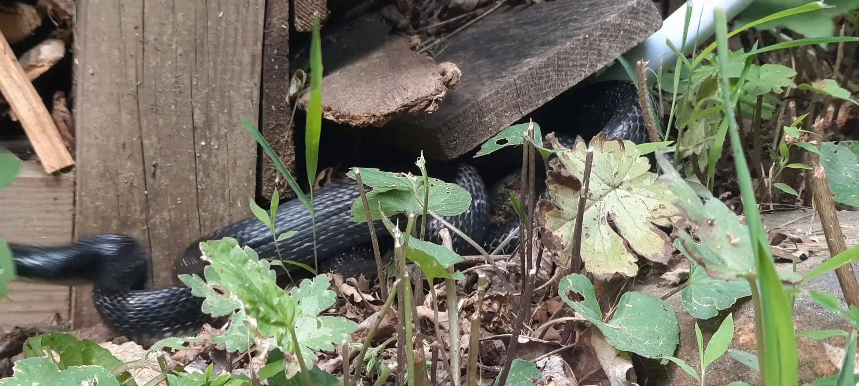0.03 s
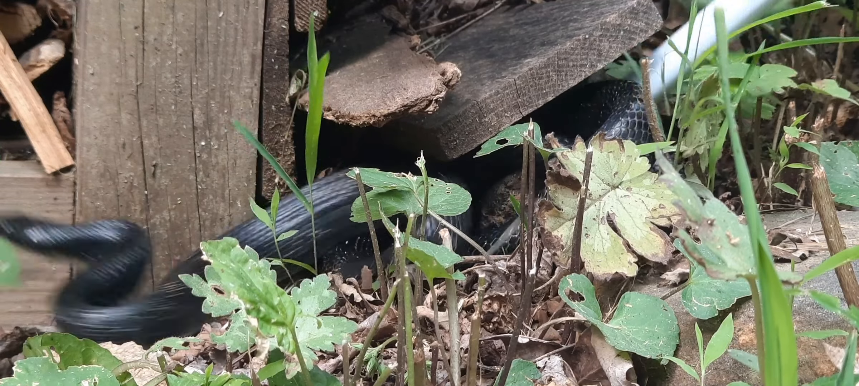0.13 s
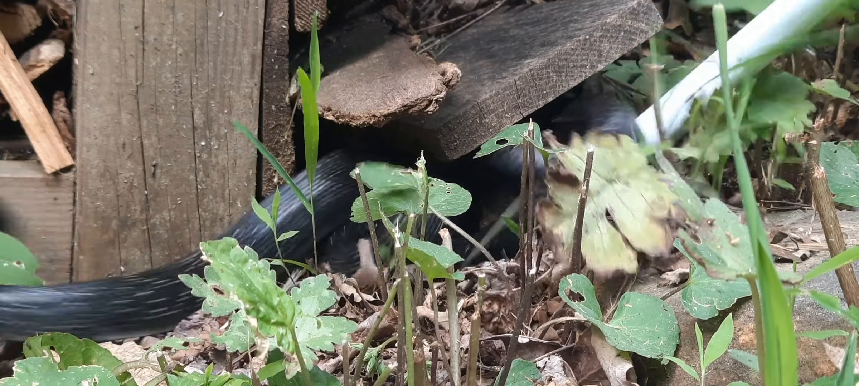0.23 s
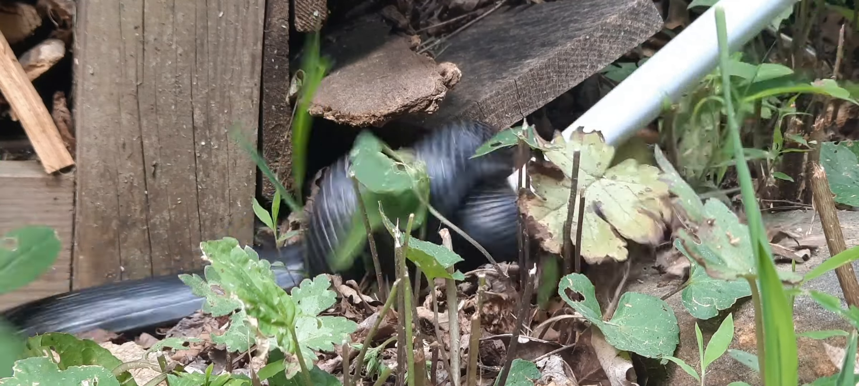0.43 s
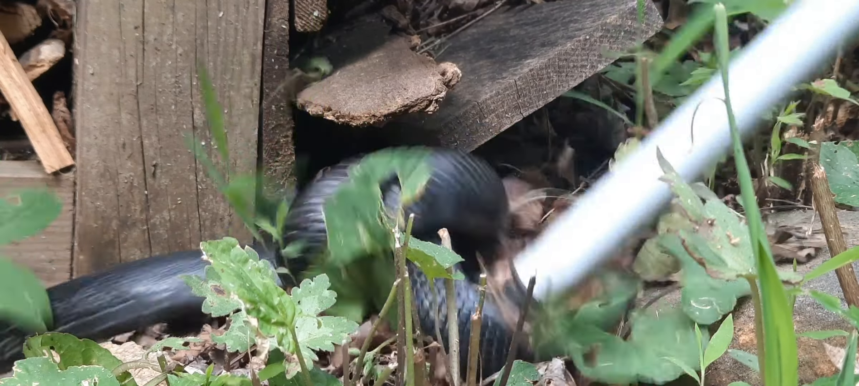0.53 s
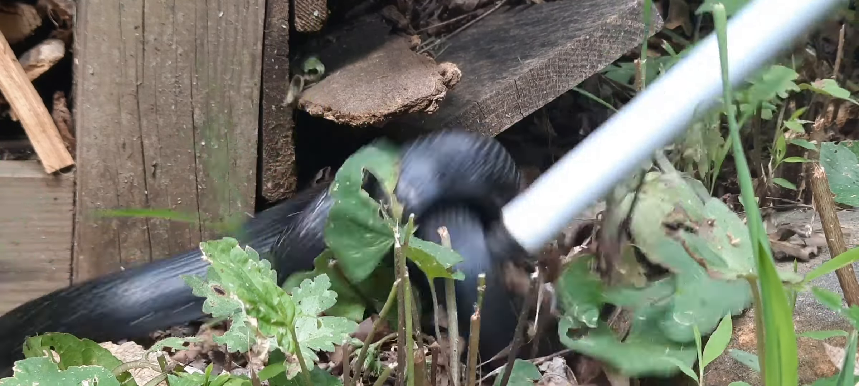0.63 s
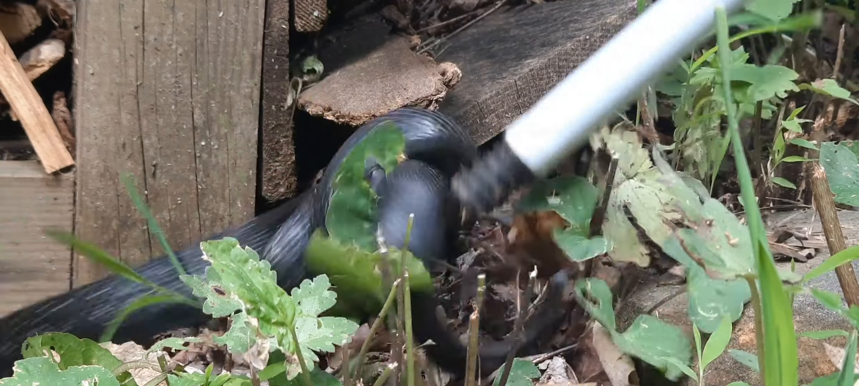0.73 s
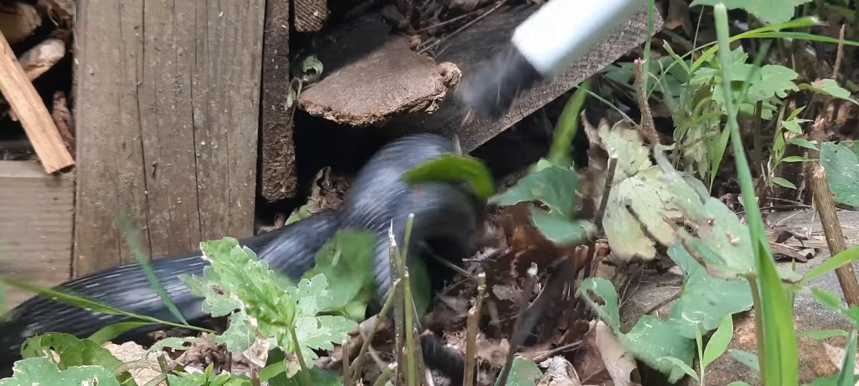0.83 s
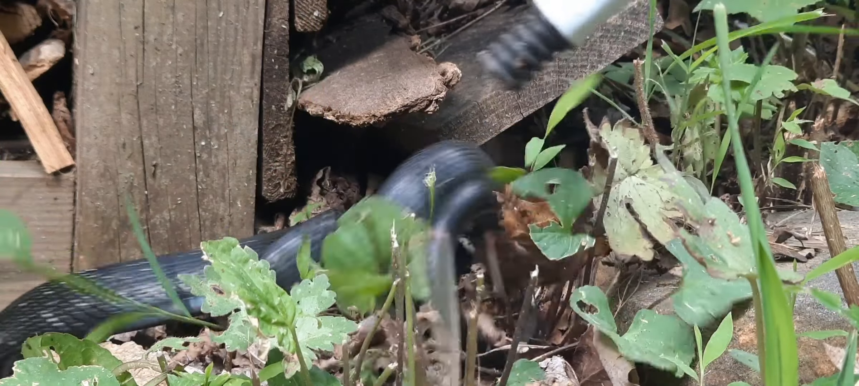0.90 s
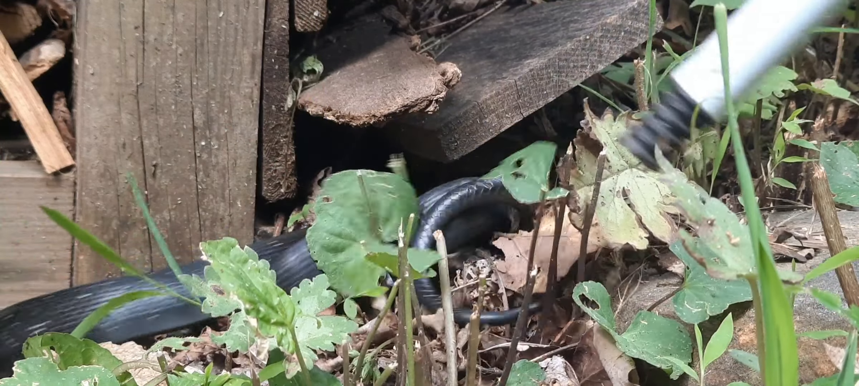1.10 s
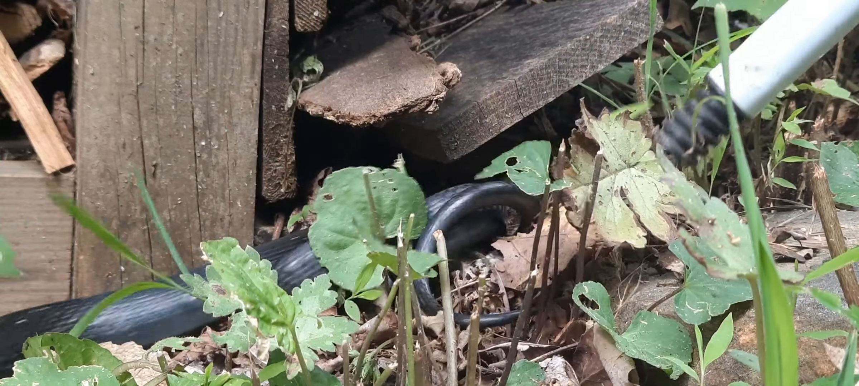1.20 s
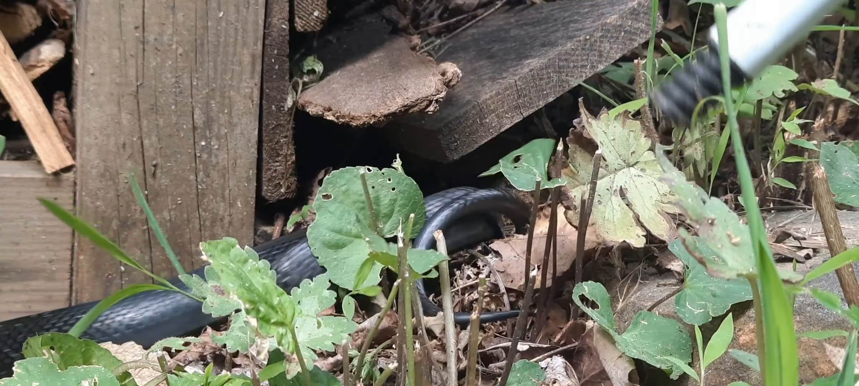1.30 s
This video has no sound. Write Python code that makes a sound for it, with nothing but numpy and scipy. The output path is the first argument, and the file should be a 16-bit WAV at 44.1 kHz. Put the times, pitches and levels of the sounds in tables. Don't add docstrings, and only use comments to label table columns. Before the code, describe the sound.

Close stereo rustling of dry leaves and weeds: quiet ticking, a short low wooden judder, then loud crackles and snapping stalks from a poking pole, easing into thin rustles over faint outdoor air.

```python
import sys
import numpy as np
from scipy import signal
from scipy.fft import rfft, irfft, next_fast_len
from scipy.io import wavfile
from scipy.ndimage import uniform_filter1d

SR = 44100
rng = np.random.default_rng(int(sys.argv[2]) if len(sys.argv) > 2 else 0)


def how_loud(loudness_db):
    steps = np.asarray(loudness_db, float) / 20
    return 10 ** steps


def persist_wave(psi):
    counts = np.round(np.clip(psi, -1, 1) * 32767).astype(np.int16)
    wavfile.write(sys.argv[1], SR, np.atleast_2d(counts).T)


N = 59535
T = np.arange(N) / SR


def rms_one(x):
    return x / np.sqrt(np.mean(x ** 2) + 1e-20)


def at_hz(points, hz):
    table_hz, value = np.array(points).T
    return np.interp(np.log(hz), np.log(table_hz), value)


def sides(pan_db):
    return how_loud(np.array([pan_db / 2, -pan_db / 2]))


def filtered(x, order, hz, kind):
    return signal.sosfilt(signal.butter(order, hz, kind, fs=SR, output="sos"), x)


def drift(rate_hz):
    r = np.exp(-80 * np.pi * rate_hz / SR)
    white = rng.standard_normal((2, N // 40 + 402))
    slow = signal.lfilter([1], [1, -2 * r, r * r], white)[:, 400:]
    return np.array([np.interp(np.arange(N) / 40, np.arange(len(v)), rms_one(v)) for v in slow])


# [pitch_hz, likeness_0_to_1]
LIKENESS = [(60, 0.54), (180, 1), (550, 0.75), (1650, 0.51), (4970, 0), (15000, 0.04)]


def bands():
    edges = 25 * 2 ** np.arange(0, 9.6, .5)
    white = rng.standard_normal((2, 2, N))
    for k, (low, high) in enumerate(zip(edges, edges[1:])):
        mid, side = filtered(white[k % 2], 2, [low, high], "band")
        hz = np.sqrt(low * high)
        alike = np.clip(at_hz(LIKENESS, hz), -.95, .99)
        yield hz, np.sqrt(1 + alike) * mid + np.sqrt(1 - alike) * side * [[1], [-1]]


# [pitch_hz, level_db]
AIR = [(15, -47), (25, -32), (76, 1.5), (211, -10.5), (1150, -22.5), (2810, -11.5), (6310, -13),
       (8970, -41), (15800, -22)]


def air():
    floor = sum(how_loud(at_hz(AIR, hz)) * noise for hz, noise in bands())
    return how_loud(-60.5) * rms_one(floor)


def ring(x, hz, t60_s):
    r, w = how_loud(-60 / (t60_s * SR)), 2 * np.pi * hz / SR
    return signal.lfilter([0, np.sin(w)], [1, -2 * r * np.cos(w), r * r], x + 1e-18)


# [pitch_hz, level_db, t60_s]
BOARD = [
    (180, -13, .04),
    (430, -16, .03),
    (580, -14, .03),
]


def pole_rub():
    start_s, peak_s, end_s, stop_s = .212, .243, .253, .002
    rise = how_loud(np.interp(T, [start_s, peak_s], [-11, 0]))
    push = rise * (T > start_s) * np.exp(-np.clip(T - end_s, 0, 1) / stop_s)
    rough = 0
    for hz, db, t60_s in BOARD:
        mode = ring(rng.standard_normal(N), hz, t60_s)
        rough = rough + how_loud(db) * mode / np.sqrt(uniform_filter1d(mode ** 2, size=600) + 1e-9)
    judder_hz = np.interp(T, [start_s, end_s], [300, 340])
    judder = np.sin(2 * np.pi * np.cumsum(judder_hz) / SR)
    judder_db = 1 + np.interp(T, [start_s, peak_s], [-10, 0])
    return how_loud(-40) * push * (rough + how_loud(judder_db) * judder)


# [start_s, peak_db, pitch_hz, broad_part_db]
TICKS = [(.0138, -42, 3100, -6), (.0232, -45, 3000, -4), (.0545, -48, 5000, -3), (.0695, -48, 5000, -6),
         (.0825, -46, 3200, -3), (.0992, -41, 2600, -9), (.1172, -44, 4000, -2), (.141, -41, 2600, -5),
         (.1472, -39, 6000, -2), (.159, -41, 14000, 0), (.169, -41, 3100, -6), (.1905, -37, 6000, -4),
         (.2018, -36, 6200, 2), (.2142, -38, 5600, -6)]
# [start_s, peak_db, pitch_hz, broad_part_db]
STALKS = [(.2642, -21, 6000, 3), (.2745, -21, 6600, -2), (.2765, -24, 5200, -2), (.2935, -26, 6000, 2),
          (.3095, -20, 6200, 0), (.3148, -23, 6500, 0), (.3225, -27, 5000, 0), (.3418, -30, 6500, -3),
          (.4245, -31, 5200, -3), (.4356, -21, 5900, 2), (.460, -31, 6400, -3), (.4826, -16, 5900, 3),
          (.4868, -19, 13100, 0), (.4972, -14, 13500, 5), (.5289, -20, 7000, 5), (.5525, -21, 5200, 0),
          (.5628, -20, 5700, 1), (.6445, -22, 6400, 0), (.6826, -21, 6400, 1), (.7055, -27, 7200, -2),
          (.7515, -27, 6100, 0), (.798, -32, 7000, -2), (.8562, -28, 7000, -3), (.8668, -29, 2400, -5),
          (1.0514, -38, 6400, 2), (1.073, -35, 3000, 3), (1.195, -43, 5000, 2), (1.3092, -38, 12000, 4)]


def snaps():
    t60_s, width, alike = .007, .45, .4
    size = 512
    out, t = np.zeros((2, N + size)), np.arange(size) / SR
    for start_s, db, hz, broad_db in [*STALKS, *TICKS]:
        white = rng.standard_normal((3, size))
        noise = (alike * white[0] + (1 - alike) * white[1:]) * how_loud(-60 * t / t60_s)
        edges = [hz / (1 + width), min(hz * (1 + width), .45 * SR)]
        burst = filtered(noise, 2, edges, "band") + how_loud(broad_db) * noise / 2
        i = int(start_s * SR)
        out[:, i:i + size] += how_loud(db + 1.5) * burst / np.abs(burst).max(axis=1, keepdims=True)
    return filtered(out[:, :N], 2, 1500, "high")


# [start_s, hold_s, level_db, brightness_db_per_octave, left_right_db]
SHOVES = [
    (0.257, 0.061, -39, 0.5, -2.5),
    (.468, 0.032, -35.5, 0.5, 5),
    (0.487, 0.015, -30.5, -1, -2.5),
    (0.504, 0.062, -37.5, 1.5, 6.5),
    (0.596, 0.063, -38.5, 0, 8),
    (0.697, 0.011, -42.5, -1.5, 3),
    (0.731, 0.04, -42.5, 0.5, 3.5),
    (0.837, 0.02, -48.5, -2, 9),
    (1.034, 0.049, -48.5, -0.5, -2),
    (1.084, 0.026, -49, -1, -2),
]


def shoves(octaves):
    attack_s, release_db_per_s = .009, 700
    power = 0
    for start_s, hold_s, db, tilt_db, pan_db in SHOVES:
        attack = np.clip(T - start_s, 0, None) / attack_s
        attack = np.minimum(attack, 1)
        release_db = release_db_per_s * np.clip(T - start_s - hold_s, 0, 1)
        gain = sides(pan_db)[:, None] * how_loud(db + tilt_db * octaves - release_db)
        power = power + attack ** 2 * gain ** 2
    return power


def crackles(vigour_db):
    breaks_per_s, spread_db = 560, 2.5
    born = rng.random(N) < breaks_per_s * how_loud(.3 * vigour_db) / SR
    return born * how_loud(2 * spread_db * np.minimum(rng.exponential(1, N), 4))


# [start_s, level_db, body_weight_on_ground_db, left_right_db]
SLIDE = [(0, -65, -1, 18), (.04, -66, -8, -5), (0.129, -58, -5.5, 3), (0.158, -52, 1, 2),
         (.25, -47, 3.5, -2), (0.362, -48, 2.5, 1.5), (0.459, -45.5, 4.5, -0.5), (.59, -37, 3.5, -3),
         (.70, -41.5, 3, 1.5), (.82, -47, 6, 3), (0.961, -46.5, 2, 0.5), (1.0, -52, 0, 2),
         (1.15, -50.5, -3, 1.5), (1.222, -59.5, 2, 3.5), (1.29, -54, -3.5, 0.5), (1.35, -60, 3, 3)]
# [pitch_hz, level_db]
LEAVES = [(60, -9.5), (200, -11), (400, -2), (1200, -8.5), (2500, 1.5), (5000, 1), (9000, 0), (15000, -2)]


def litter():
    weight_hz = 1540
    start_s, *curves = np.transpose(SLIDE)
    db, weight_db, pan_db = (np.interp(T, start_s, curve) for curve in curves)
    vigour_db = db - db.mean()
    shared, out = crackles(vigour_db), 0
    for hz, noise in bands():
        burst_s = 0.00061 + 16 / hz / 10
        r = np.exp(-1 / (SR * burst_s))
        breaks = shared + how_loud(2 * 1) * crackles(vigour_db)
        power = signal.lfilter([1 - r], [1, -r], breaks + 1e-18)
        power = power / uniform_filter1d(power, size=2500) + how_loud(2 * -1.5)
        slide_db = db + weight_db / (1 + (hz / weight_hz) ** 4)
        slide = (how_loud(slide_db) * sides(pan_db)) ** 2
        stir = slide + shoves(np.log2(hz / 4000))
        patchy_db = 2.0 * drift(11) * (hz > weight_hz)
        out = out + how_loud(at_hz(LEAVES, hz) + patchy_db) * np.sqrt(power * stir) * noise
    return how_loud(-0.5) * out


def scene():
    return air() + pole_rub() + snaps() + litter()


# [pitch_hz, level_db]
PORT_LEFT = [(100, -3.5), (1000, 3.5), (4500, -1), (6500, -3), (10500, -3), (13500, 4.5), (15500, 2.5)]
# [pitch_hz, level_db]
PORT_RIGHT = [(100, -3.5), (1000, 1), (4200, 0), (6500, 8), (8000, -3.5), (9300, -14), (11500, -8),
              (14500, 3.5)]


def port_colour(x):
    size = next_fast_len(N + 2048)
    hz = np.maximum(np.arange(size // 2 + 1) * SR / size, 1)
    colour_db = np.array([at_hz(PORT_LEFT, hz), at_hz(PORT_RIGHT, hz)])
    return irfft(rfft(x, size) * how_loud(colour_db), size)[:, :N]


def roll_off(x):
    return signal.sosfilt(signal.butter(12, 16250, fs=SR, output="sos"), x)


def record(dry):
    x = port_colour(dry)
    x = signal.sosfilt(signal.cheby2(24, 60, 15950, fs=SR, output="sos"), x)
    x = filtered(x, 2, 55, "high")
    return roll_off(x)


dry = scene()
out = record(dry)
persist_wave(out)
```